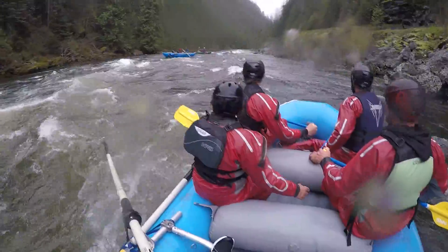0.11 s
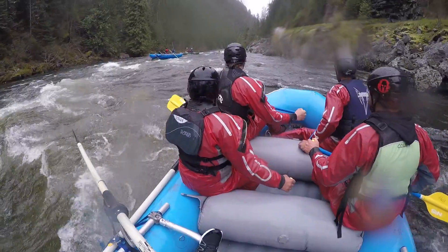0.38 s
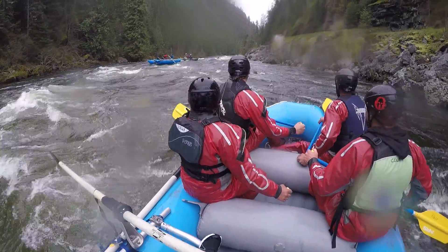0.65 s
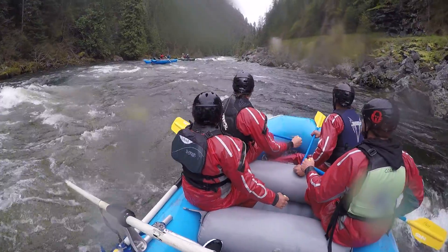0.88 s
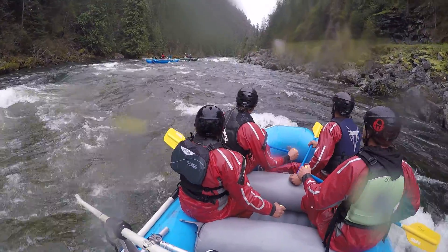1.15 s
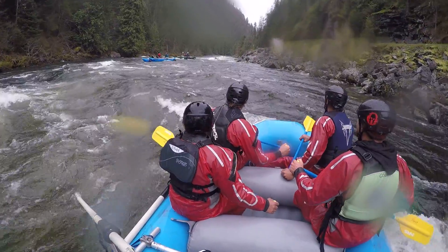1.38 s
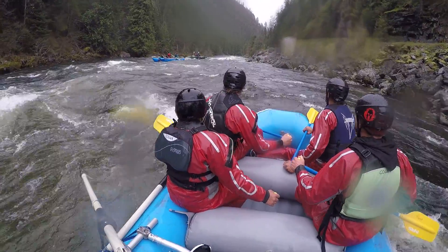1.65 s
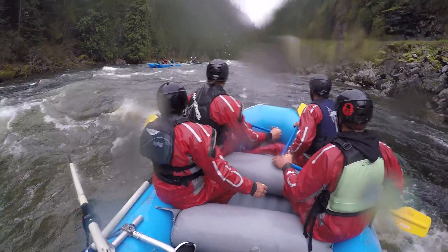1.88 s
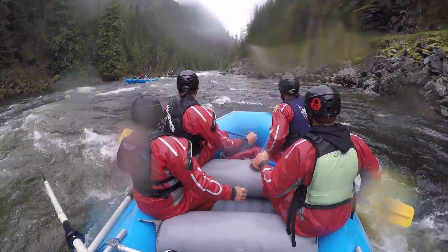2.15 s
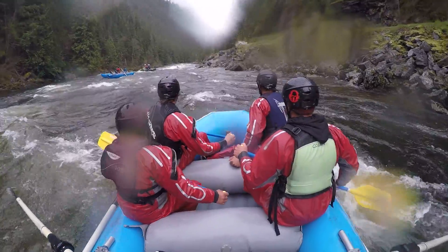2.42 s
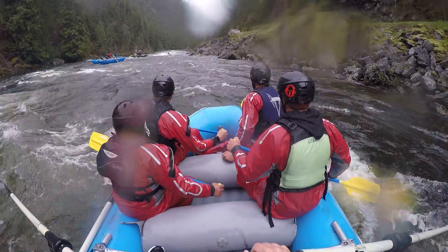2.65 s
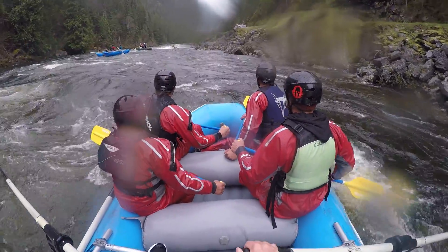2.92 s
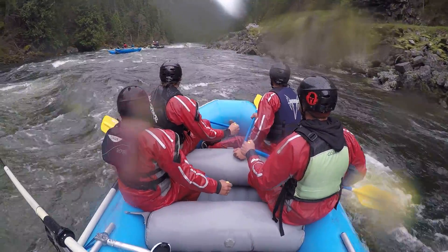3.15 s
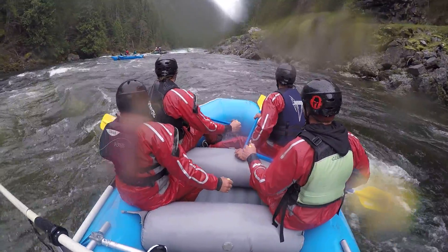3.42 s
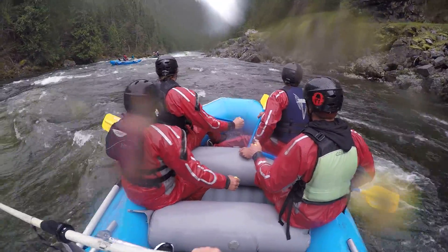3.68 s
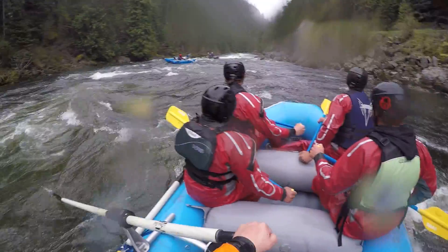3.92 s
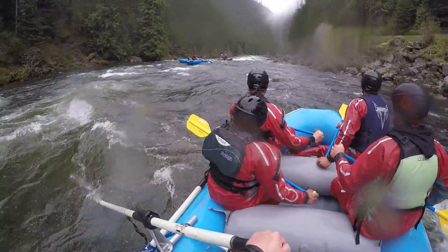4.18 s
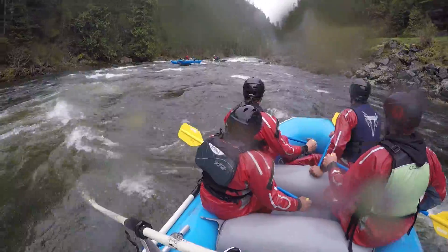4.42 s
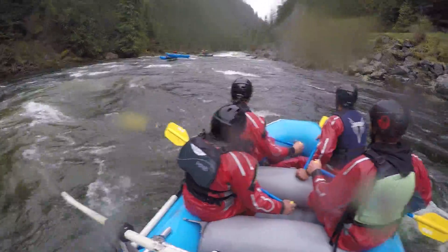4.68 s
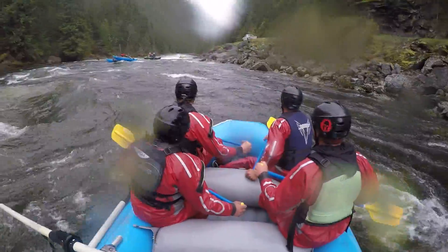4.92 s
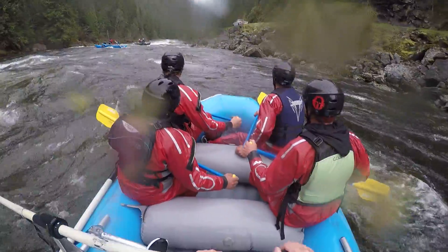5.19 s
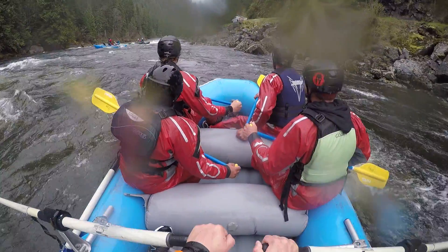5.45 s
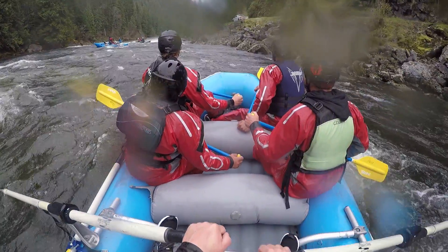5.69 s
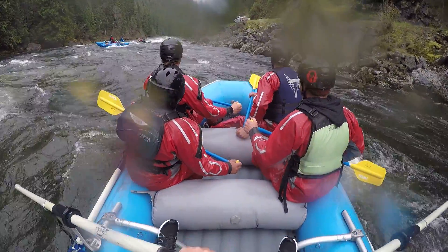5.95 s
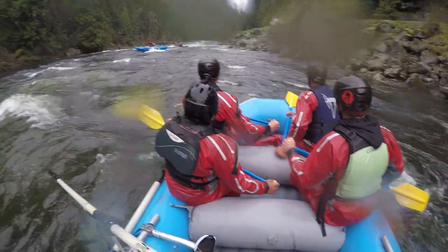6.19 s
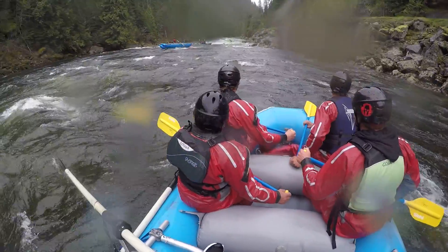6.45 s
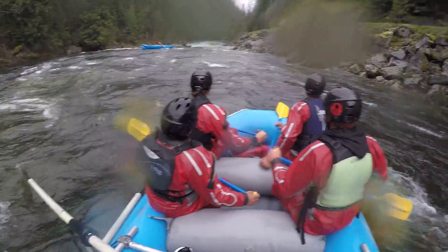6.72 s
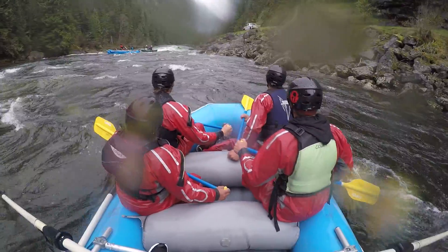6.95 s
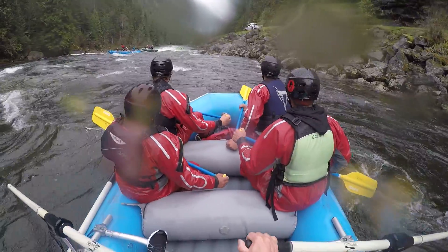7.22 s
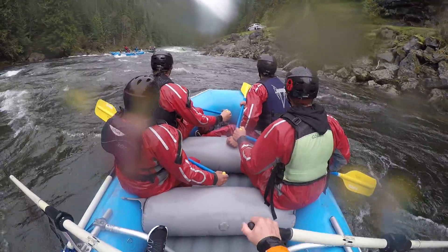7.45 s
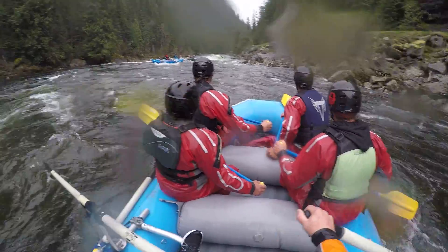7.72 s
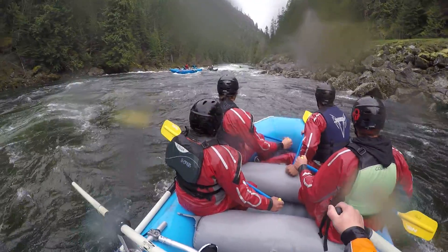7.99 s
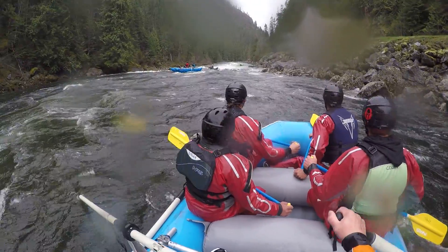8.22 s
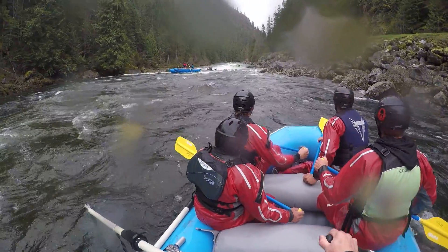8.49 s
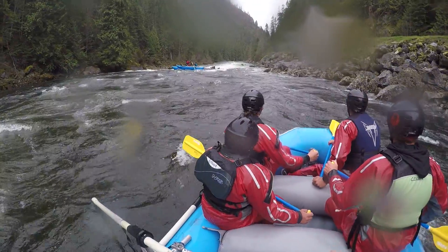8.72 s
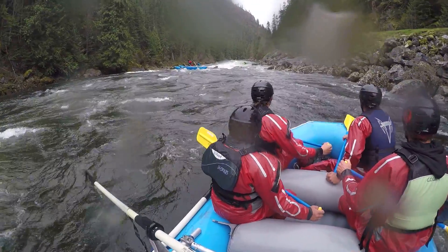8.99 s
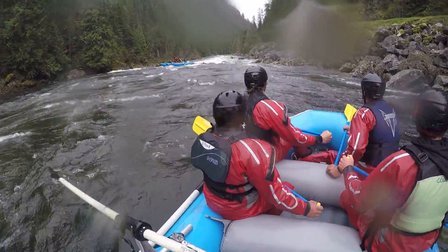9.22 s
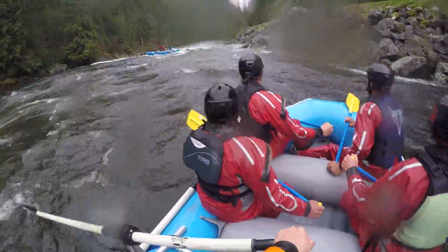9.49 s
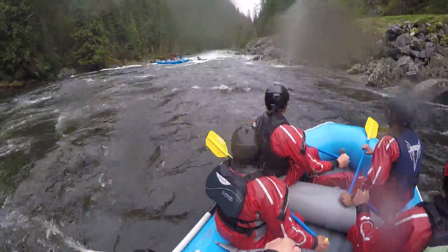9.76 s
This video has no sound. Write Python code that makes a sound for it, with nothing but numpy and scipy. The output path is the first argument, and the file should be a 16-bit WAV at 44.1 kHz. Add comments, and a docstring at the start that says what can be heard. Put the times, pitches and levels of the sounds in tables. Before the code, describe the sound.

River rapids rush continuously, boxy and close, while scattered hard drops click on a plastic housing over uneven low rumble and occasional dull jolts.

```python
"""On a raft in whitewater, at the microphone of a small camera shut in a plastic housing on a helmet.
All round, the river's rush is noise coloured by the housing's resonances and what its walls let through.
On the housing itself, drops and a fine drizzle tick by ringing the same modes; spray puffs as bright hiss.
Through the mount come wind, as low rumble and thrum noise rising with each gust, and jolts, as thumps
of decaying sine."""
import sys
import numpy as np
from scipy import signal
from scipy.io import wavfile
from scipy.ndimage import uniform_filter1d

SR = 44100
rng = np.random.default_rng(int(sys.argv[2]) if len(sys.argv) > 2 else 0)


def ratio(d):
    """dB to gain"""
    e = np.asarray(d, float) / 20
    return 10 ** e


def transcribe(signal):
    """Save signal, clipped to [-1, 1], as a 16-bit WAV file at the path in sys.argv[1]."""
    frames = np.atleast_2d(signal).T
    limited = np.clip(frames, -1, 1)
    pcm = np.round(limited * 32767).astype(np.int16)
    wavfile.write(sys.argv[1], SR, pcm)


N = 435257  # length in samples

# Resonances of the plastic housing:
# pitch_hz, width_hz, hiss_db (in the steady rush), strike_db (under a drop)
HOUSING_MODES = [(863, 167, -11, -9), (1410, 320, -4, 7), (1804, 235, -1.5, 1.5), (2396, 254, -6, 0.5),
                 (2692, 557, -3, 5.5), (3015, 177, -16.5, -5), (3430, 470, -15.5, 5), (4020, 370, -17, -5),
                 (4562, 450, -11.5, 0.5), (5770, 330, -35, -14), (6830, 880, -21, 1),
                 (8360, 670, -26.5, 0.5), (9650, 790, -31.5, 1.5), (11200, 2200, -36, 6),
                 (13800, 5900, -46, 11)]
# Sound passing the housing walls between the modes: pitch_hz, level_db (per Hz, on the scale of hiss_db)
WALL_LEAK = [(120, -10), (200, -10.5), (400, -12.5), (700, -16), (1200, -18), (2100, -5.5), (3200, -16.5),
             (6000, -24), (15000, -36.5)]
# Level of the river about the raft: time_s, rush_db
RIVER_LEVEL = [(0.0, -42.5), (0.93, -40.5), (1.59, -41), (2.75, -44.5), (3.08, -42.5), (3.85, -44),
               (4.56, -43), (5.22, -45.5), (5.63, -44), (6.57, -45), (7.06, -44), (7.5, -45.5), (9.23, -45),
               (9.87, -45.5)]
SPRAY_SWELL = 1.3  # swell of the treble, as a multiple of the rush's swell in dB

# Spectrum of wind rumble in the mount: pitch_hz, level_db (per Hz, relative)
RUMBLE_SPECTRUM = [(5, -7), (15, -3), (30, -4), (45, -23.5), (65, -12.5), (130, -39.5), (200, -31.5),
                   (400, -60), (1000, -120)]
# Gusts on the mount: middle_s, length_s, rumble_db, thrum_db (both added to the calm)
GUSTS = [(0.1, 0.71, -53, -70), (0.587, 0.5, -48, -52.5), (1.037, .18, -46, -57), (1.35, 0.19, -51, -57.5),
         (1.95, 0.28, -51, -52), (2.743, 0.73, -76, -74), (3.288, 0.28, -65, -64),
         (3.822, 0.45, -54, -39.5), (4.2, 0.42, -51.5, -58.5), (4.705, 0.96, -54, -61.5),
         (5.72, 0.53, -46, -59), (6.273, 0.33, -63, -62), (6.863, 0.42, -44, -64),
         (7.465, 0.27, -60, -60.5), (8.355, 0.1, -51, -69), (8.796, 0.7, -55, -77), (9.193, 0.27, -47, -48),
         (9.406, 0.51, -35, -64), (9.846, 0.69, -42, -73)]
CALM_RUMBLE_DB, CALM_THRUM_DB = -51, -60.5
THRUM_HZ, THRUM_WIDTH_HZ = 108, 26
LUMP_DB, FASTEST_LUMP_HZ = 0.5, 7.7  # rms depth and top rate of the wind's unevenness

# Single drops striking the housing: start_s, level_db (peak of the body), centre_hz (rings most where
# it lands), snap_db (treble modes relative to the body), fall_db (per octave from centre_hz; sign ignored)
DROPS = [(0.3093, -9, 2460, -10, 5), (0.474, -25, 1400, -32, 9), (1.23, -24, 3200, -30, 3),
         (1.67, -14, 1450, -32, 45), (1.678, -19.5, 1410, -32, 45), (1.738, -16.5, 1940, -20, 11),
         (1.8496, -6.5, 2330, -13, 9.5), (2.141, -38, 2620, -7, 13), (2.156, -30, 3840, -18, 13),
         (2.403, -34.5, 4500, -22, 18), (2.523, -32, 2400, -28, 14), (2.641, -35, 3200, -0.5, 6),
         (2.983, -30, 4300, -9, 1), (3.2762, -24, 2600, -25, 0), (3.321, -24, 1850, -20, 8),
         (3.57, -34, 1900, -28, -26), (3.827, -29.5, 3540, -6, 10), (4.024, -46, 1900, 2, 8),
         (4.099, -18, 1500, -20, 3), (4.254, -20, 2300, -8, 4), (4.343, -28, 1360, -30, 26),
         (5.148, -34, 4500, -15, 16), (5.21, -24.5, 1900, -34, 18), (5.5383, -32, 2560, -28, 18),
         (5.9915, -29.5, 3550, 0.5, 18), (6.067, -38, 1850, -10, 18), (6.0921, -3.5, 2370, -5.5, 8.5),
         (6.17, -30, 1800, -21, 12), (6.298, -21.5, 2800, -13, 9), (6.363, -19.5, 1410, -17, 9),
         (7.043, -22.5, 1940, -26, 16), (7.159, -30, 4560, -18, 23), (7.217, -46, 4500, -16, 9),
         (7.325, -32, 3400, -4, 19), (7.586, -19, 2520, -26, 20), (8.2673, 3.5, 1860, -11.5, 18.5),
         (8.545, -23.5, 1900, -22, 14), (8.751, -25, 2600, -11.5, 5), (8.778, -25.5, 1400, -36, 45),
         (9.031, -26.5, 2490, -26, 22), (9.115, -29.5, 2750, -4, 24), (9.431, -35, 2600, -10, 8),
         (9.603, -25, 3300, -11, -1), (9.804, -19, 1970, -18, 12), (9.824, -29, 2630, -14, 10),
         (9.846, -11, 2120, -21, 11)]
SNAP_HZ = 6300  # modes above this make the snap, the rest the body
TICK_LOW_HZ = 423  # the drop ticks carry little below this
RISE_CYCLES, SOFT_CYCLES_PER_DB = 0.067, 0.05  # less snap: softer landing, slower build-up
FALL_LIMIT_DB = 9  # distant modes may still ring this far above the snap
DETUNE, STRENGTH_DB = 0.012, 1.5  # spread of mode pitch (fraction) and mode level
DRIZZLE_PER_S, DRIZZLE_LEAST_DB = 49, -47  # rate, and level of the smallest drops
DRIZZLE_SNAP_DB, DRIZZLE_SNAP_SPREAD_DB, DRIZZLE_FALL_DB = -15.5, 3.1, 1
PLACES = 12  # landing places of the drizzle

# Jolts of the mount: start_s, level_db, pitch_hz, t60_s
THUMPS = [(0.042, -39.5, 88.5, 0.084), (1.629, -41.5, 109, 0.13), (2.668, -31, 94, .062),
          (3.36, -40, 108, .15), (3.766, -28, 108, 0.12), (3.828, -36.5, 188, 0.091),
          (3.882, -31, 112, 0.14), (4.76, -37, 99, 0.069), (6.808, -26.5, 94, 0.082),
          (9.189, -39, 104, 0.14), (9.28, -31.5, 108, 0.12)]
THUMP_RISE_S = 0.0065

# Puffs of fine spray: start_s, level_db (hiss rms at its height), length_s (height comes at a third)
PUFFS = [(3.299, -52, 0.072), (3.364, -54, 0.078), (8.905, -57, 0.027), (9.099, -52, .04),
         (9.202, -46, 0.026), (9.273, -59, .03), (9.298, -39, 0.021), (9.337, -50, 0.019),
         (9.38, -50, 0.015), (9.52, -51, 0.036), (9.55, -55.5, 0.068), (9.657, -50.5, 0.019)]
# Spectrum of the spray hiss: pitch_hz, level_db (relative)
PUFF_SPECTRUM = [(2500, -38), (4000, 3), (4600, 11), (5500, -8), (7000, 4), (9000, -9), (11000, -14),
                 (15000, -30)]

EDGE_HZ = 15350  # top of the recorded band


def evened(x):
    """Scales to rms 1."""
    return x / np.sqrt(np.mean(x ** 2) + 1e-20)


def read(points, hz):
    """Reads a spectrum table on a log-frequency axis."""
    f, value = np.transpose(points)
    return np.interp(np.log(hz + 1), np.log(f + 1), value)


def add(mix, start_s, sound):
    """Mixes a sound in at its start time."""
    part = mix[max(round(start_s * SR), 0):][:len(sound)]
    part += sound[:len(part)]


def noise(magnitude, size):
    """Noise from random short-time spectra whose heights are magnitude(hz, t)."""
    hop = size // 4
    frames = N // hop + 5
    hz = np.fft.rfftfreq(size, 1 / SR)
    real, imaginary = rng.standard_normal((frames, len(hz), 2)).T
    spectra = (real + 1j * imaginary) * magnitude(hz[:, None], np.arange(frames) * hop / SR)
    return signal.istft(spectra, nperseg=size, noverlap=size - hop)[1][:N]


def river(hz, t):
    """Rush through modes and walls, its treble tilted by spray.

    Random patches in time and pitch, and a shared flicker, make the hiss uneven, most in the treble."""
    modes = 0
    for f, width, hiss_db, _ in HOUSING_MODES:
        modes = modes + ratio(2 * hiss_db) / (1 + (2 * (hz - f) / width) ** 2) ** 2
    colour = np.sqrt(modes + ratio(2 * read(WALL_LEAK, hz)))

    rush_db = np.interp(t, *np.transpose(RIVER_LEVEL))
    treble = np.clip(np.log2(hz / 2800 + 1e-9), 0, 1)
    bass = np.clip(np.log2(900 / (hz + 1)) * 0.26, 0, 1) * 0.5  # the far river swells less
    swell_db = (1 - bass + treble * (SPRAY_SWELL - 1)) * (rush_db - rush_db.mean())

    field = rng.standard_normal((len(t), len(hz))).T
    patches = evened(uniform_filter1d(uniform_filter1d(field, size=14, axis=0), size=20, axis=1))
    patch_db = 0.53 + 0.6 * np.clip(hz / 12000, 0, 1.3) ** 2
    flicker = evened(uniform_filter1d(rng.standard_normal(len(t)), size=4))
    flicker_db = 0.62 + 0.57 * treble
    return colour * ratio(swell_db + patch_db * patches + flicker_db * flicker)


def rush():
    """The steady hiss of whitewater, heard through the housing."""
    mean_db = np.mean(np.transpose(RIVER_LEVEL)[1])
    return ratio(mean_db) * evened(noise(river, size=512))


def lumps():
    """Slow uneven swing of rms 1, from sines of random phase."""
    t = np.arange(N) / SR
    rates = np.geomspace(1, FASTEST_LUMP_HZ, 16)
    phases = rng.random(len(rates))
    return evened(sum(np.sin(2 * np.pi * (f * t + p)) for f, p in zip(rates, phases)))


def mount():
    """Lumpy wind rumble and the broad resonance of helmet and mount, both raised by each gust."""
    t = np.arange(N) / SR
    rumble_level = np.full(N, ratio(CALM_RUMBLE_DB))
    thrum_level = np.full(N, ratio(CALM_THRUM_DB))
    for middle_s, length_s, rumble_db, thrum_db in GUSTS:
        swell = np.cos(np.pi * np.clip((t - middle_s) / length_s, -0.5, 0.5)) ** 2
        rumble_level += ratio(rumble_db) * swell
        thrum_level += ratio(thrum_db) * swell

    def resonance(hz, _):
        return 1 / (1 + (2 * (hz - THRUM_HZ) / THRUM_WIDTH_HZ) ** 2)

    thrum = evened(noise(resonance, size=4096)) * thrum_level * ratio(LUMP_DB * lumps())
    wind = evened(noise(lambda hz, _: ratio(read(RUMBLE_SPECTRUM, hz)), size=4096))
    return thrum + wind * rumble_level * ratio(LUMP_DB * lumps())


def tick(centre_hz, snap_db, fall_db):
    """One drop, body peak 1: modes ring a few ms, weaker off centre, neighbours in opposite phase."""
    t, body, snap = np.arange(1024) / SR, 0, 0
    cycles = max(RISE_CYCLES - SOFT_CYCLES_PER_DB * snap_db, 0.02)
    most_fall_db = max(-snap_db - FALL_LIMIT_DB, 14)
    chance = rng.standard_normal((len(HOUSING_MODES), 2))
    for k, (hz, width, _, strike_db) in enumerate(HOUSING_MODES):
        pitch_chance, level_chance = chance[k]
        level = ratio(strike_db + STRENGTH_DB * level_chance) * (-1) ** k
        rise = (1 - np.exp(-t / (0.00003 + cycles / hz))) ** 2  # low modes build up slower
        decay = np.exp(-np.pi * 0.9 * width * t)
        ring = level * rise * decay * np.sin(2 * np.pi * hz * (1 + DETUNE * pitch_chance) * t)
        if hz > SNAP_HZ:
            snap = snap + ring
        else:
            off_centre_db = abs(fall_db * np.log2(hz / centre_hz))
            body = body + ring * ratio(-min(off_centre_db, most_fall_db))
    body = signal.lfilter(*signal.butter(2, TICK_LOW_HZ, "high", fs=SR), body)
    # the snap comes as the body swings out
    snap = np.roll(snap, np.argmax(abs(body) > 0.3 * abs(body).max()))
    return body / abs(body).max() + ratio(snap_db) * snap / abs(snap).max()


def drizzle():
    """Small drops at random times, each ringing the housing as its landing place does."""
    out = np.zeros(N)
    louder_db = 4.14 * np.minimum(rng.exponential(1, N), 2.2)
    strikes = ratio(louder_db) * (rng.random(N) < DRIZZLE_PER_S / SR)
    place = rng.integers(0, PLACES, N)
    for k, centre_hz in enumerate(np.geomspace(1300, 4600, PLACES)):
        snap_db = DRIZZLE_SNAP_DB + DRIZZLE_SNAP_SPREAD_DB * rng.standard_normal()
        sound = tick(centre_hz, snap_db, DRIZZLE_FALL_DB)
        out += ratio(DRIZZLE_LEAST_DB) * signal.oaconvolve(strikes * (place == k), sound)[:N]
    return out


def thumps():
    """Each jolt swings the mount a few cycles, with a soft start."""
    out, t = np.zeros(N), np.arange(SR // 3) / SR
    for start_s, level_db, pitch_hz, t60_s in THUMPS:
        shape = (1 - np.exp(-t / THUMP_RISE_S)) ** 2 * ratio(-60 * t / t60_s)
        add(out, start_s, ratio(level_db) * shape / shape.max() * np.sin(2 * np.pi * pitch_hz * t))
    return out


def drops():
    """Single drops, each striking the housing's modes at its own time and place."""
    out = np.zeros(N)
    for start_s, level_db, centre_hz, snap_db, fall_db in DROPS:
        add(out, start_s, ratio(level_db) * tick(centre_hz, snap_db, fall_db))
    return out


def puffs():
    """Short bright bursts of spray hiss, rising fast and dying away."""
    shape, t = np.zeros(N), np.arange(SR // 5) / SR
    for start_s, level_db, length_s in PUFFS:
        u = 3 * t / length_s
        add(shape, start_s, ratio(level_db) * u * np.exp(1 - u))
    return shape * evened(noise(lambda hz, _: ratio(read(PUFF_SPECTRUM, hz)), size=256))


def scene():
    """All sources at one microphone."""
    return (rush() + mount() + drizzle() + thumps() + drops() + puffs())[None]


def band_limit(x):
    """A steep low-pass at the top of the band."""
    return signal.sosfilt(signal.butter(12, 16540, fs=SR, output="sos"), x)


def record(dry):
    """Limits the band, then rounds off peaks under a soft ceiling."""
    edge = signal.firwin(511, EDGE_HZ, window=("kaiser", 4), fs=SR)
    banded = signal.oaconvolve(dry, edge[None], "same")
    mix = np.tanh(banded) * 1.052
    return band_limit(mix)


dry = scene()
out = record(dry)
transcribe(out)
```